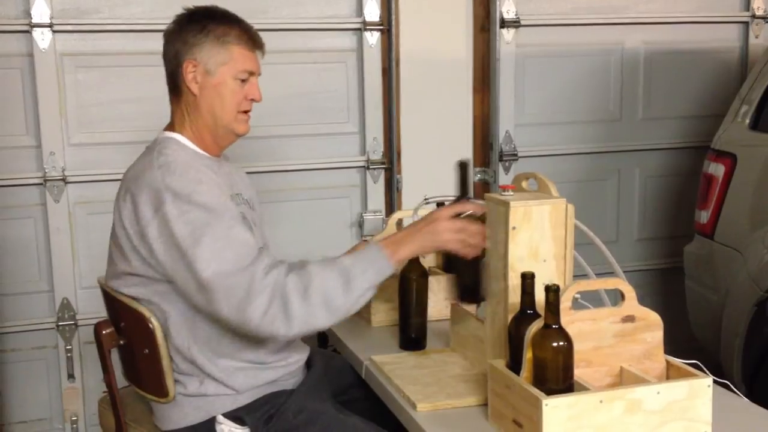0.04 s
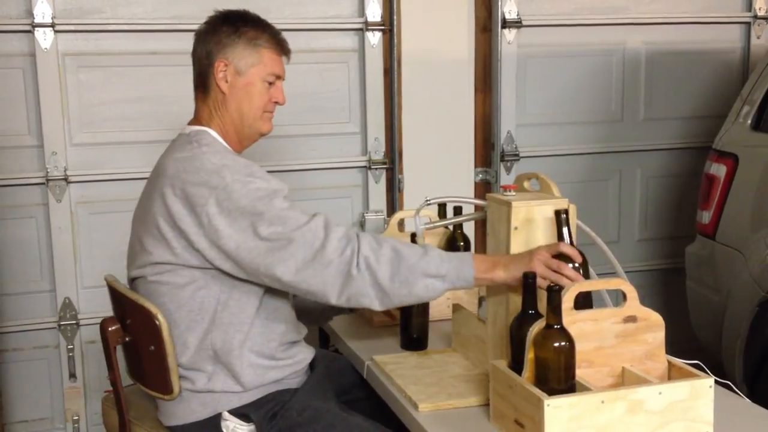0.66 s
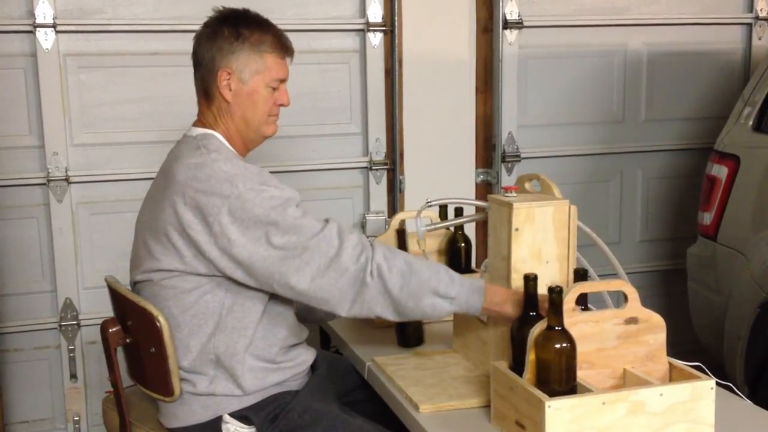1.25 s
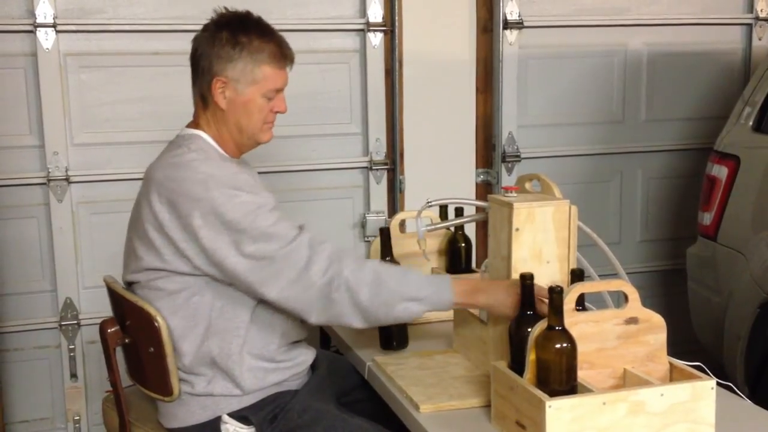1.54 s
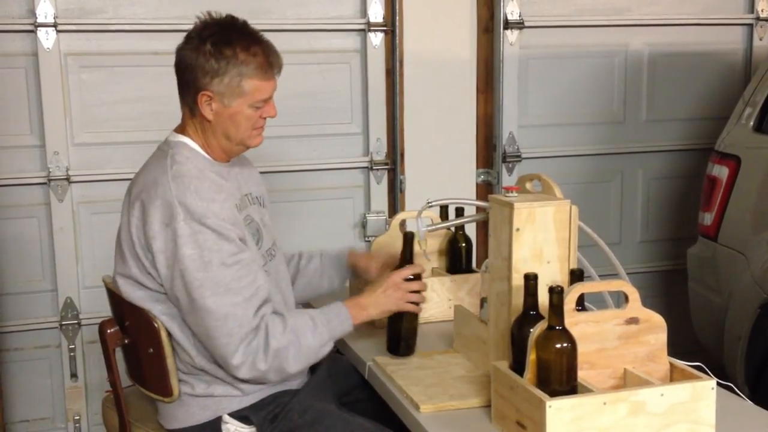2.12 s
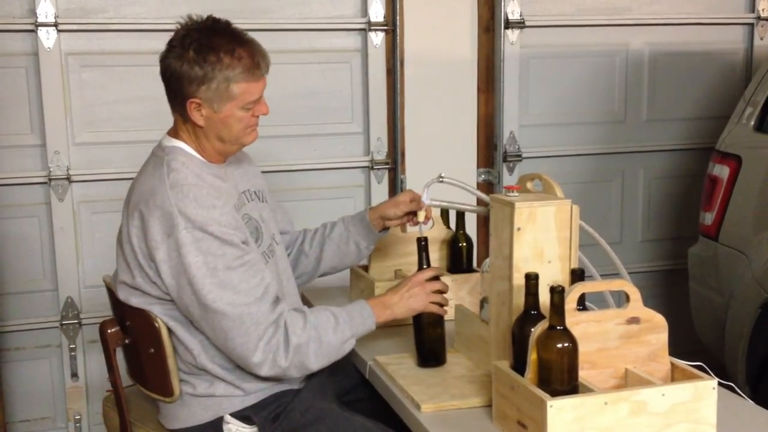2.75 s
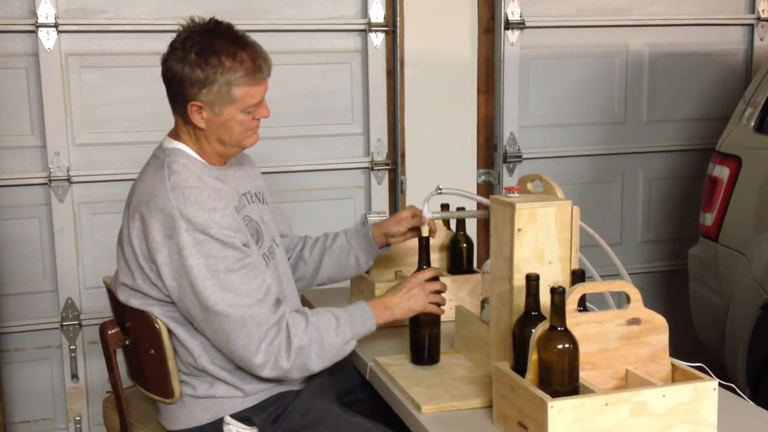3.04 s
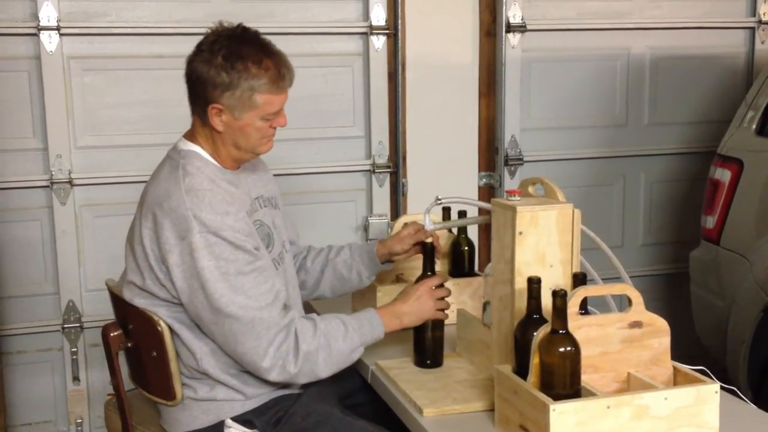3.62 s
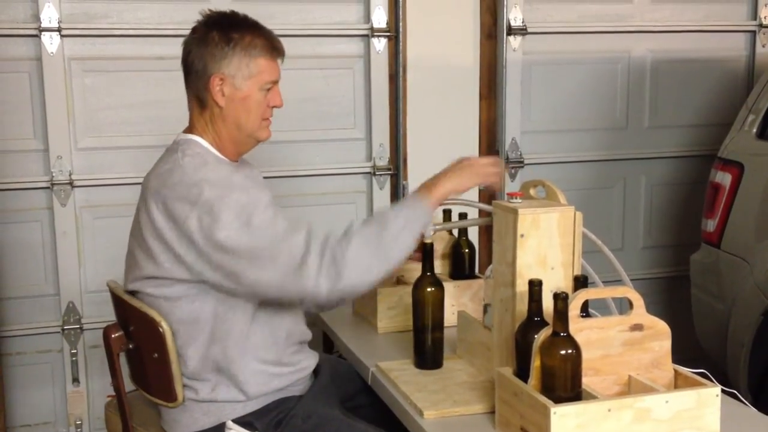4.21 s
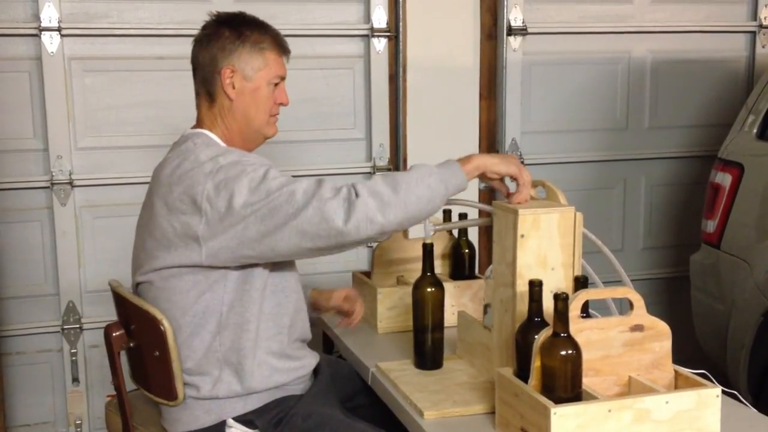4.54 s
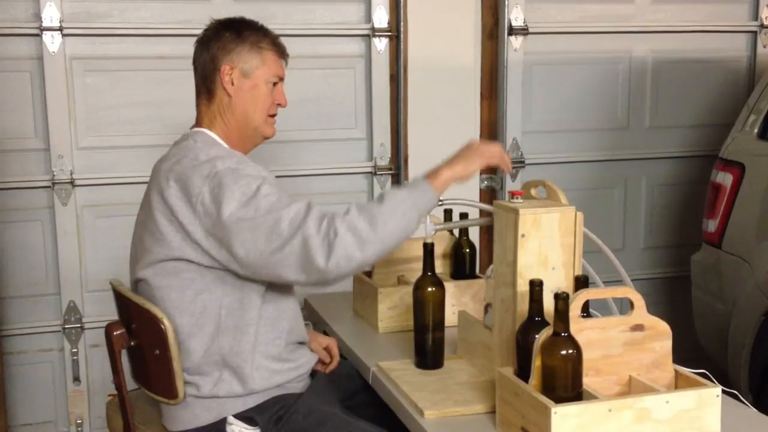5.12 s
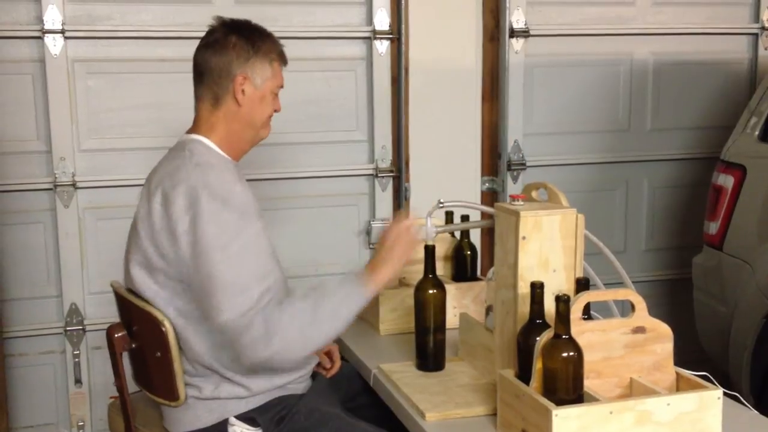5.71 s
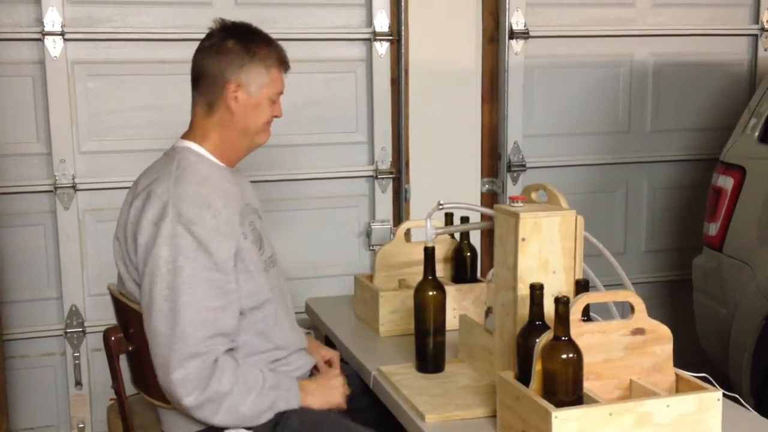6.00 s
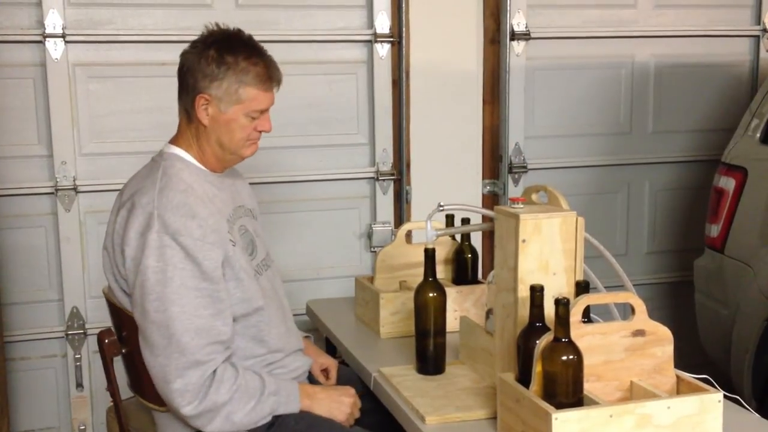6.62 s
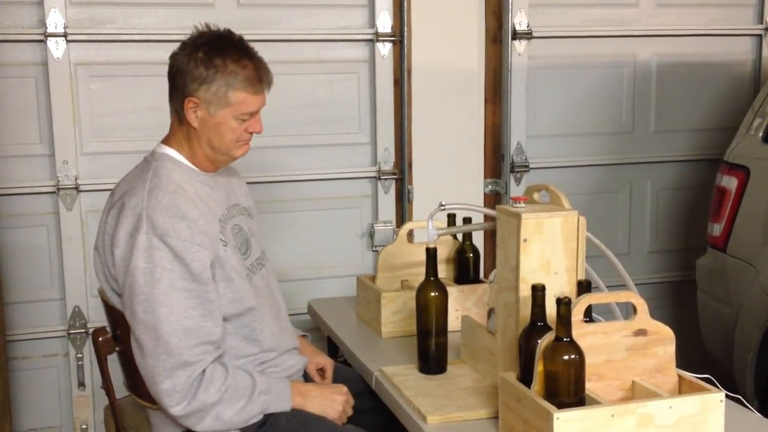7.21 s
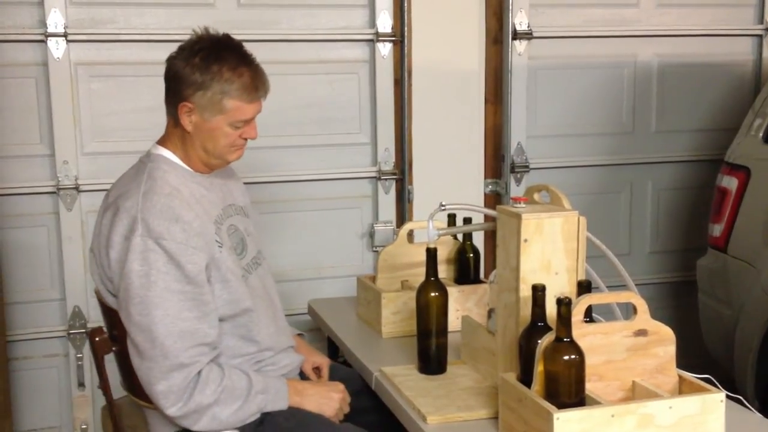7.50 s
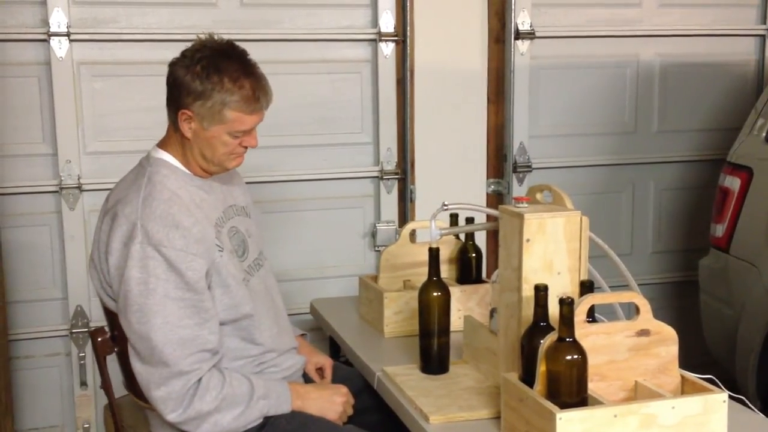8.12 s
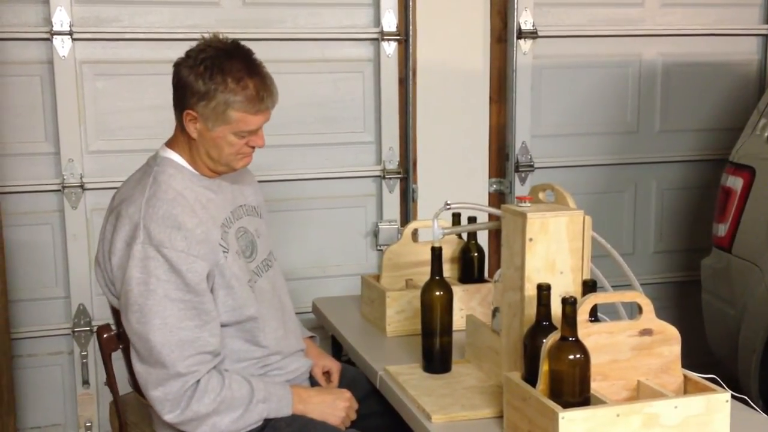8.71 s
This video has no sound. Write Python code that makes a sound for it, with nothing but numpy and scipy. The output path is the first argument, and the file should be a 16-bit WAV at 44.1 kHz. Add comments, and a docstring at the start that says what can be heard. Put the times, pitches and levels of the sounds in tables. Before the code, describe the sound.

Hollow knocks of glass bottles landing and sliding in a wooden crate open the scene, followed by softer knocks on a board and small clinks of a tube against glass. Then come three quick clusters of sharp clacks from fittings, a faint chair creak, a sleeve rustle and a final click. Underneath, a small pump hums and whines throughout, all in the short echo of a garage.

```python
"""A small pump motor hums in a garage while hand and filling tube rub and tap on glass.
Glass bottles are set down and pushed along, first in a wooden crate, then on a board.
Fittings clack on top of a wooden stand; later a chair joint creaks, cloth rubs and two tiny pings sound.
Knocks, clacks and creaks carry the short, dense echo of the garage."""
import sys
import numpy as np
from scipy import signal
from scipy.fft import rfft, irfft, next_fast_len
from scipy.io import wavfile

SR = 44100
rng = np.random.default_rng(int(sys.argv[2]) if len(sys.argv) > 2 else 0)


def transcribe(signal):
    """Save signal, clipped to [-1, 1], as a 16-bit WAV file at the path in sys.argv[1]."""
    frames = np.atleast_2d(signal).T
    limited = np.clip(frames, -1, 1)
    pcm = np.round(limited * 32767).astype(np.int16)
    wavfile.write(sys.argv[1], SR, pcm)


N = 385875
HIT_SAMPLES = 32768
TIME_S, AGE_S = np.arange(N) / SR, np.arange(HIT_SAMPLES) / SR
HIT_HZ = np.fft.rfftfreq(HIT_SAMPLES, 1 / SR)
SHAFT_HZ, CASING_FIRST_MULTIPLE = 29.21, 47

# Pump hum. Each row: multiple of the shaft rate, rms level in dB.
HUM_LINES = [(5, -66.5), (7, -63.5), (8, -74.5), (9, -72), (11, -71), (13, -65), (15, -62), (19, -67),
             (21, -65.5), (23, -72), (25, -72.5), (26, -70.5), (34, -71), (41, -72)]
# Casing whine. Each entry: rms level in dB of the next shaft multiple, from CASING_FIRST_MULTIPLE up.
CASING_LINES_DB = [-68, -76, -77, -63, -62, -64.5, -63.5, -68.5]
# Rattle of the pump's works. Each row: frequency in Hz, width in Hz, weight in dB.
BUZZ_PEAKS = [(860, 490, 2), (1424, 470, -3)]
# Cooling air. Each row: frequency in Hz, gain in dB.
AIR_SPECTRUM = [(25, -39), (65, -14), (90, 1.5), (150, 1), (300, 6.5), (430, 8), (520, 3), (900, -2),
                (1250, -6), (1600, 0), (2100, -4.5), (3500, -10), (5500, -12), (15000, -10)]

# Hand or tube rubs a bottle. Each row: start in seconds, length in seconds, level in dB.
GLASS_SCRAPES = [(0, 1.28, -69.5), (1.42, 1.52, -69), (3.02, 0.52, -70.5)]
# Rubbed glass. Each row: frequency in Hz, width in Hz, gain in dB.
SCRAPE_PEAKS = [(2760, 800, 19), (3200, 130, 0), (4520, 150, 9)]

# Bottle landings. Each row: start in seconds, level in dB, contact cut-off in Hz, panel boom in dB.
CRATE_HITS = [(0.605, -19, 2600, -8.5), (0.736, -38.5, 4500, 12), (0.752, -41.5, 400, 5),
              (1.100, -41.5, 2200, -20), (1.131, -21.5, 2950, -6.5), (1.355, -43.5, 400, -5),
              (1.410, -44, 4000, -5), (1.626, -47.5, 260, -16), (1.746, -41.5, 520, -13)]
BOARD_HITS = [(2.3768, -32, 3720, -2), (2.402, -32.5, 600, -4), (2.885, -54.5, 300, 7),
              (3.183, -35.5, 2400, 2.5), (3.208, -33.5, 380, -5.5), (3.468, -48, 700, 3),
              (3.485, -49, 450, 4), (3.640, -53, 600, -5)]
# Bottle and wood ringing together. Each row: frequency in Hz, gain in dB, t60 in seconds.
CRATE_RING = [(157.8, -6.5, 0.49), (192.2, 5, 0.24), (337.9, 0.5, 0.25), (425.8, 9, 0.082),
              (468.5, -2.5, 0.19), (522.5, -11.5, 0.36), (561, -11.5, 0.35), (650, -20.5, 0.3),
              (831, -25.5, 0.55), (910, -14.5, 0.14), (1086, -20, 0.28), (1482, -8, 0.061),
              (1816, -14, 0.13), (2680, -26, 0.13), (4600, -35, 0.33)]
BOARD_RING = [(153.8, -9, 0.37), (169, 2.5, 0.25), (288.6, 7.5, 0.082), (350, -3.5, 0.26),
              (392.5, -2.5, 0.19), (428, -6.5, 0.187), (980, -8, 0.07), (1150, -12, 0.079),
              (1560, -19, 0.065), (4500, -29, 0.27)]
# Wood under a bottle. Each row: frequency in Hz, gain in dB.
THUD_SPECTRUM = [(40, -32), (90, -14), (140, -21.5), (240, -3), (480, -10.5), (720, -18), (1200, -20),
                 (1700, -25.5), (2300, -23.5), (3500, -32.5), (4500, -27), (5500, -33.5), (9000, -26.5),
                 (15000, -53)]
# Struck bottle. Each row: frequency in Hz, width in Hz, gain in dB.
BOTTLE_PEAKS = [(822, 130, -3.5), (1470, 56, -1), (1624, 60, 8.5), (1904, 42, 2.5), (2584, 76, 3),
                (2880, 82, 3), (4000, 120, -3), (4490, 61, -6)]

# Bottle pushed along wood. Each row: start in seconds, length in seconds, level in dB.
BOTTLE_SLIDES = [(0.73, 0.15, -48.5), (1.13, 0.37, -47), (1.63, 0.08, -46), (1.8, 0.3, -54.5),
                 (3.3, 0.54, -63)]
# Its rumble. Each row: frequency in Hz, gain in dB.
SLIDE_SPECTRUM = [(50, -35), (100, -43), (135, 10), (175, -0.5), (240, -6), (350, -0.5), (600, -20),
                  (2000, -43)]

# Taps on glass. Each row: start in seconds, level in dB, frequency the contact favours in Hz.
GLASS_TAPS = [(0.736, -53, 1800), (1.413, -55, 1800), (1.746, -66, 2560), (2.640, -62, 3050),
              (2.642, -70, 6200), (2.788, -61.5, 4700), (3.055, -68.5, 4600), (3.056, -68, 2150),
              (3.322, -60.5, 3240), (3.355, -73, 8300), (3.44, -72, 7800)]
# Ring of the glass. Each row: frequency in Hz, gain in dB, t60 in seconds.
GLASS_MODES = [(1860, 15, 0.19), (3100, 7, 0.28), (3180, 0, 0.63), (3210, 1, 0.39), (3550, -6, 0.31),
               (4450, 1, 0.14), (4550, 3, 0.18), (6185, 10, 0.12), (7260, 1, 0.33)]
# Crate or tube grazes glass.
# Each row: start in seconds, length in seconds, level in dB, favoured frequency in Hz.
GLASS_GRAZES = [(1.458, 0.13, -72, 4460), (3.03, 0.33, -69, 3320)]

# Fittings on the stand. Each row: start in seconds, level before tilt in dB, hollow body in dB,
# treble tilt in dB per octave, ring in dB.
FITTING_HITS = [(2.785, -46.5, -17, -7, -25), (3.048, -72, 4, 7.5, -9), (4.62, -40.5, -7.5, -1.5, -7),
                (4.631, -36.5, -12, -6.5, -6.5), (4.794, -49, -9, -1, -16), (4.7991, -31, -1.5, -1.5, -22),
                (4.807, -37, 5.5, -12, -14), (5.262, -59.5, 5, -4, -2), (5.2955, -29, -15, -7, -5),
                (5.307, -34, -8.5, -8, -3.5), (7.446, -50.5, -29, -3, -22), (8.724, -25.5, -42, -4, -43)]
# Their crack. Each row: frequency in Hz, gain in dB.
CRACK_SPECTRUM = [(40, -37), (120, -19), (260, -0.5), (390, 3), (650, -4), (1000, -11.5), (1800, -11.5),
                  (2500, 1), (3000, -5.5), (4400, 1.5), (5400, -3.5), (6800, 6), (8400, 1), (11700, 7.5),
                  (13200, -5), (15300, 4.5)]
# Their ring and the stand's hollow body. Each row: frequency in Hz, width in Hz, gain in dB.
FITTING_PEAKS = [(680, 52, 14.5), (870, 38, 22.5), (1870, 88, 7), (2470, 46, 5), (3400, 62, 7.5),
                 (4000, 80, 7), (4460, 89, -3)]
STAND_PEAKS = [(437, 66, 5.5), (873, 280, 4), (1110, 110, 5), (1356, 110, 6), (1796, 160, 3.5),
               (2300, 190, -1), (3760, 63, -2.5), (4070, 70, -6)]

# Soft bumps and joint slips of the chair. Each row: start in seconds, level in dB.
CHAIR_BUMPS = [(6.145, -61), (7.447, -50.5)]
CHAIR_SLIPS = [(6.476, -56), (6.600, -56.5), (6.671, -58.5), (6.711, -59), (6.765, -59), (6.818, -61.5),
               (6.864, -64), (6.894, -62)]
# Chair frame. Each row: frequency in Hz, width in Hz, gain in dB.
CHAIR_PEAKS = [(426, 38, 6), (554, 22, 2), (805, 53, -5), (933, 54, 5), (2280, 420, -11.5),
               (4170, 140, -13), (4670, 91, -9.5), (5900, 120, -15.5), (7060, 270, -15), (8000, 140, -15.5),
               (11000, 4000, -26)]

# Sleeve strokes. Each row: start in seconds, length in seconds, level in dB.
SLEEVE_STROKES = [(7.53, .31, -55), (8.17, 0.3, -58)]
# Cloth hiss. Each row: frequency in Hz, gain in dB.
CLOTH_SPECTRUM = [(100, -8), (700, 10), (1800, 11.5), (3000, 4), (4400, 8.5), (5300, 3), (11500, 4),
                  (15000, -3)]
# Tiny pings. Each row: start in seconds, level in dB, frequency in Hz.
HIGH_PINGS = [(7.925, -77, 6140), (8.035, -73, 5330)]


def undb(db):
    """Decibels to gain."""
    return 10 ** (np.asarray(db) / 20)


def spectrum(points, hz):
    """Gain at hz from (Hz, dB) points."""
    point_hz, db = np.transpose(points)
    return undb(np.interp(np.log(hz + 1), np.log(point_hz), db))


def resonances(peaks, hz):
    """Gain at hz of (Hz, width, dB) resonances, summed in power."""
    powers = (undb(db) ** 2 * (hz * width) ** 2 / ((centre ** 2 - hz ** 2) ** 2 + (hz * width) ** 2)
              for centre, width, db in peaks)
    return np.sqrt(sum(powers))


def noise(shape, table):
    """Noise of rms 1, coloured by a spectrum or by resonances."""
    size = next_fast_len(N)
    gain = shape(table, np.fft.rfftfreq(size, 1 / SR))
    x = irfft(rfft(rng.standard_normal(size)) * gain, size)[:N]
    return x / x.std()


def drift(rate_hz):
    """Random curve with a spread near 1."""
    knots_s = np.arange(0, N / SR + 1, 1 / rate_hz)
    return np.interp(TIME_S, knots_s, rng.standard_normal(len(knots_s)))


def colour(x, gain):
    """Minimum-phase filter for one blow; the far tail fades out."""
    cepstrum = irfft(np.log(gain + 1e-6))
    cepstrum[1:HIT_SAMPLES // 2] *= 2
    cepstrum[HIT_SAMPLES // 2 + 1:] = 0
    fade = np.minimum(1, 2 * (1 - AGE_S / AGE_S[-1])) ** 2
    return irfft(rfft(x) * np.exp(rfft(cepstrum))) * fade


def unit(x):
    """Scale a blow to rms 1 over its first 50 ms."""
    return x / np.sqrt(np.mean(x[:SR // 20] ** 2))


def add(out, start_s, x):
    """Mix a blow in at start_s."""
    i = int(start_s * SR)
    out[i:i + len(x)] += x[:N - i]


def harmonics(lines, turns, phases_cycles, waver_db, waver_hz):
    """Lines locked to the shaft angle, each wavering in level."""
    out = 0
    for (multiple, db), phase in zip(lines, phases_cycles):
        tone = np.sqrt(2) * np.sin(2 * np.pi * (round(multiple) * turns + phase))
        out += tone * undb(db + waver_db * drift(waver_hz))
    return out


def buzz(turns):
    """The works rattle alike on every turn: weak lines between those of hum and whine."""
    size = int(SR / SHAFT_HZ)
    gain = resonances(BUZZ_PEAKS, np.fft.rfftfreq(size, 1 / SR)) ** 2
    gain[[round(multiple) for multiple, _ in HUM_LINES]] = 0
    gain[CASING_FIRST_MULTIPLE:CASING_FIRST_MULTIPLE + len(CASING_LINES_DB)] = 0
    one_turn = irfft(gain * np.exp(2j * np.pi * rng.random(len(gain))), size)
    return np.interp(turns, np.arange(size) / size, one_turn / one_turn.std(), period=1)


def pump(wander_hz=0.02006, whine_hold_s=4, fade_db_per_s=1.78, lead_turns=0.095, buzz_db=-65.5):
    """The motor hums and buzzes; each stroke makes the casing chirp, a fluttering whine near 1.5 kHz."""
    turns = np.cumsum(SHAFT_HZ + wander_hz * drift(1)) / SR
    hum = harmonics(HUM_LINES, turns, rng.random(len(HUM_LINES)), waver_db=0.69, waver_hz=2.01)
    fade_db = fade_db_per_s * np.maximum(TIME_S - whine_hold_s, 0)
    lines = [(CASING_FIRST_MULTIPLE + k, db - fade_db) for k, db in enumerate(CASING_LINES_DB)]
    # Higher lines come earlier in the turn, so each chirp falls.
    phases_cycles = [lead_turns * (k * k / 2 + drift(1)) for k in range(len(lines))]
    whine = harmonics(lines, turns, phases_cycles, waver_db=1.78, waver_hz=1)
    return hum + whine + undb(buzz_db) * buzz(turns)


def cooling_air(level_db=-61.5):
    """Steady rush of the motor's cooling air."""
    return undb(level_db) * noise(spectrum, AIR_SPECTRUM)


def pushes(strokes, attack_s=0.019, release_s=0.11):
    """Gain of sliding contacts: each gets going, holds for its length, dies away."""
    gain = 0
    for start_s, length_s, db in strokes:
        rise = np.clip((TIME_S - start_s) / attack_s, 0, 1)
        fall = np.exp(-np.maximum(TIME_S - start_s - length_s, 0) / release_s)
        gain += undb(db) * rise * fall
    return gain


def glass_scrapes(catch_db=3.5, catch_hz=30.3):
    """Hand and tube catch on the glass as they rub along it."""
    catches = undb(catch_db * drift(catch_hz))
    return pushes(GLASS_SCRAPES) * catches * noise(resonances, SCRAPE_PEAKS)


def garage_click(gain, direct, t60_low_s=0.37, t60_high_s=0.2, early_db=2, grain_db=11):
    """A click coloured by gain, at unit level: direct sound, grainy early reflections, two-band tail."""
    early = np.exp(-((AGE_S - 0.013) / 0.0071) ** 2)  # bench, door and ceiling answer first
    echo = rng.standard_normal(HIT_SAMPLES)
    grain = np.exp(-AGE_S / 0.0068) * (rng.standard_normal(HIT_SAMPLES) - 1.2)
    echo *= undb(early_db * early + grain_db * grain)
    low = signal.sosfilt(signal.butter(1, 4000, fs=SR, output="sos"), echo)
    response = low * 1000 ** (-AGE_S / t60_low_s) + (echo - low) * 1000 ** (-AGE_S / t60_high_s)
    response /= np.linalg.norm(response)
    response[0] += direct
    return unit(colour(response, gain))


def ring(modes, swell_cycles, scatter_db, detune):
    """Modes swell over a few cycles and decay; each contact favours them a little differently."""
    hz, db, t60_s = np.transpose(modes)[:, :, None]
    strength, shift, phase = rng.standard_normal((3, len(modes), 1))
    waves = np.sin(2 * np.pi * (hz * (1 + detune * shift) * AGE_S + phase))
    swell = (1 - np.exp(-AGE_S * hz / swell_cycles)) ** 2
    decay = 1000 ** (-AGE_S / t60_s)
    return unit((undb(db + scatter_db * strength) * waves * swell * decay).sum(0))


def bottle_knocks(hits, modes, thud_db, click_db, swell_cycles):
    """A bottle lands on wood: click, thud and ring; a softer contact pushes longer and loses treble."""
    out = np.zeros(N)
    radiated = 1 / np.sqrt(1 + (115 / (HIT_HZ + 1)) ** 8)  # small panels hardly radiate deep bass
    glass = resonances(BOTTLE_PEAKS, HIT_HZ)
    thud_gain = spectrum(THUD_SPECTRUM, HIT_HZ) * np.hypot(1, glass)
    click_gain = glass / (1 + HIT_HZ / 1500)
    for start_s, db, contact_hz, boom_db in hits:
        thud = garage_click(thud_gain, direct=0.031, t60_low_s=0.51, t60_high_s=0.13)
        click = garage_click(click_gain, direct=1.2, t60_low_s=0.15, t60_high_s=0.1)
        ringing = ring(modes, swell_cycles, scatter_db=0.26, detune=0.002)
        blow = ringing + undb(thud_db) * thud + undb(click_db) * click
        contact = 1 / (1 + (HIT_HZ / contact_hz) ** 2)
        boom = undb(boom_db / (1 + (HIT_HZ / 240) ** 4))
        add(out, start_s, undb(db) * unit(colour(blow, contact * boom * radiated)))
    return out


def bottle_slides(judder_db=4, judder_hz=25.02):
    """A pushed bottle judders and rumbles on the wood."""
    judder = undb(judder_db * drift(judder_hz))
    return pushes(BOTTLE_SLIDES, attack_s=0.028) * judder * noise(spectrum, SLIDE_SPECTRUM)


def touched_modes(favoured_hz, db_per_octave=25):
    """Glass rings most in the partials that move at the contact point."""
    return [(hz, db - db_per_octave * abs(np.log2(hz / favoured_hz)), t60_s)
            for hz, db, t60_s in GLASS_MODES]


def glass_taps():
    """Light taps leave the glass ringing."""
    out = np.zeros(N)
    for start_s, db, favoured_hz in GLASS_TAPS:
        tink = ring(touched_modes(favoured_hz), swell_cycles=2.2, scatter_db=1.5, detune=0.0037)
        add(out, start_s, undb(db) * tink)
    return out


def glass_singing(width_hz=45, catch_db=3, catch_hz=40):
    """Wood or tube slides along a bottle in small catches and keeps it singing."""
    out = 0
    for start_s, length_s, db, favoured_hz in GLASS_GRAZES:
        peaks = [(hz, width_hz, mode_db) for hz, mode_db, _ in touched_modes(favoured_hz)]
        out += pushes([(start_s, length_s, db)]) * noise(resonances, peaks)
    return out * undb(catch_db * drift(catch_hz))


def panel_ripple(depth_db=3.6, spacing_hz=70):
    """Gain of many overlapping panel modes: random peaks and dips."""
    knots = rng.standard_normal(2048)
    return undb(depth_db * np.interp(HIT_HZ / spacing_hz, np.arange(len(knots)), knots))


def fitting_clacks(pivot_hz=4100):
    """Hard fittings snap: a broad crack, a ring and the stand's hollow body."""
    out = np.zeros(N)
    treble_octaves = np.log2(np.maximum(HIT_HZ / pivot_hz, 1))
    for start_s, db, body_db, tilt_db_per_octave, ring_db in FITTING_HITS:
        crack_gain = spectrum(CRACK_SPECTRUM, HIT_HZ) * panel_ripple()
        crack = garage_click(crack_gain, direct=0.28, t60_low_s=0.4, t60_high_s=0.22)
        body = garage_click(resonances(STAND_PEAKS, HIT_HZ), direct=0.28, t60_low_s=0.33, t60_high_s=0.13)
        ringing = garage_click(resonances(FITTING_PEAKS, HIT_HZ), direct=0.67, t60_high_s=0.48)
        blow = crack + undb(body_db) * body + undb(ring_db) * ringing
        add(out, start_s, undb(db) * colour(blow, undb(tilt_db_per_octave * treble_octaves)))
    return out


def chair(chatter_s=0.011, scatter_db=2):
    """A joint sticks and slips in quick pairs, ringing the frame; soft bumps wake its low resonances."""
    out = np.zeros(N)
    for start_s, db in CHAIR_SLIPS:
        for lag_s in (0, chatter_s):
            frame = [(hz, width_hz, peak_db + scatter_db * rng.standard_normal())
                     for hz, width_hz, peak_db in CHAIR_PEAKS]
            slip = garage_click(resonances(frame, HIT_HZ), direct=0.45, t60_low_s=0.19, t60_high_s=0.22)
            add(out, start_s + lag_s, undb(db) * slip)
    bump_gain = resonances(CHAIR_PEAKS, HIT_HZ) / (1 + (HIT_HZ / 560) ** 4)
    for start_s, db in CHAIR_BUMPS:
        add(out, start_s, undb(db) * garage_click(bump_gain, direct=0.19, t60_low_s=0.18))
    return out


def sleeve_rubs(speed_power=1.75):
    """A sleeve brushes trousers: arm speed is half a sine, and the hiss follows a power of it."""
    gain = 0
    for start_s, length_s, db in SLEEVE_STROKES:
        progress = np.clip((TIME_S - start_s) / length_s, 0, 1)
        gain += undb(db) * np.abs(np.sin(np.pi * progress)) ** speed_power
    return gain * noise(spectrum, CLOTH_SPECTRUM)


def pings(width_hz=20):
    """Tiny high pings, one narrow resonance each."""
    out = np.zeros(N)
    for start_s, db, hz in HIGH_PINGS:
        note_gain = resonances([(hz, width_hz, 0)], HIT_HZ)
        add(out, start_s, undb(db) * garage_click(note_gain, direct=1))
    return out


def scene():
    """All sources, summed to mono."""
    air = cooling_air()
    crate = bottle_knocks(CRATE_HITS, CRATE_RING, thud_db=-9.5, click_db=-18.5, swell_cycles=2.6)
    board = bottle_knocks(BOARD_HITS, BOARD_RING, thud_db=-10, click_db=-18, swell_cycles=1)
    blows = crate + board + fitting_clacks() + glass_taps() + pings()
    friction = glass_singing() + chair() + bottle_slides() + glass_scrapes() + sleeve_rubs()
    return (air + pump() + blows + friction)[None]


def record(dry):
    """Steep low-pass at 15.3 kHz."""
    return signal.sosfilt(signal.ellip(12, 0.2, 70, 15300, fs=SR, output="sos"), dry)


dry = scene()
out = record(dry)
transcribe(out)
```